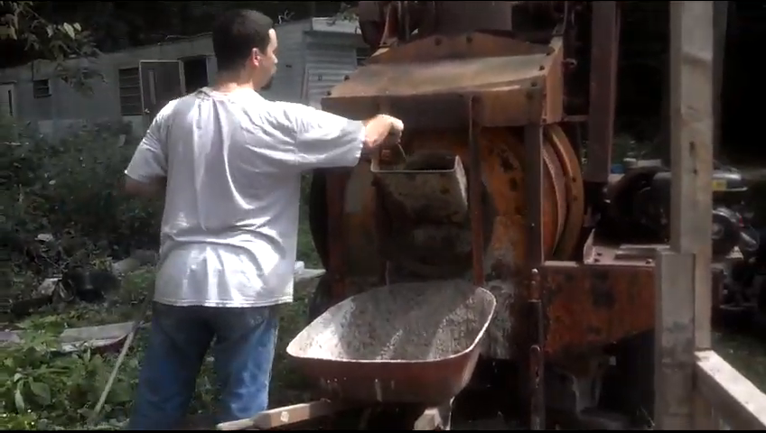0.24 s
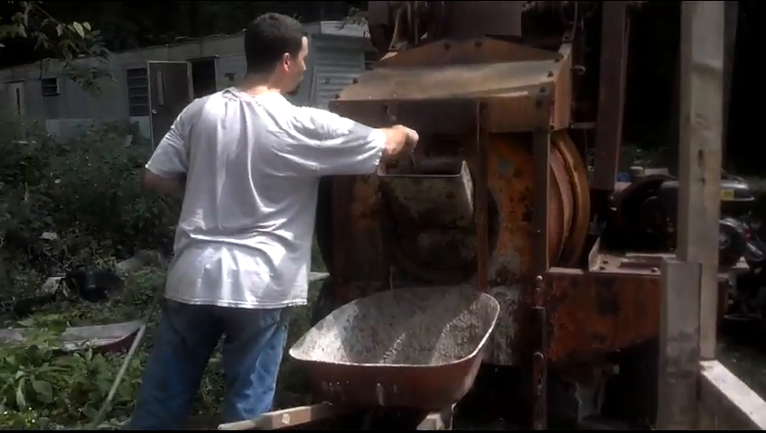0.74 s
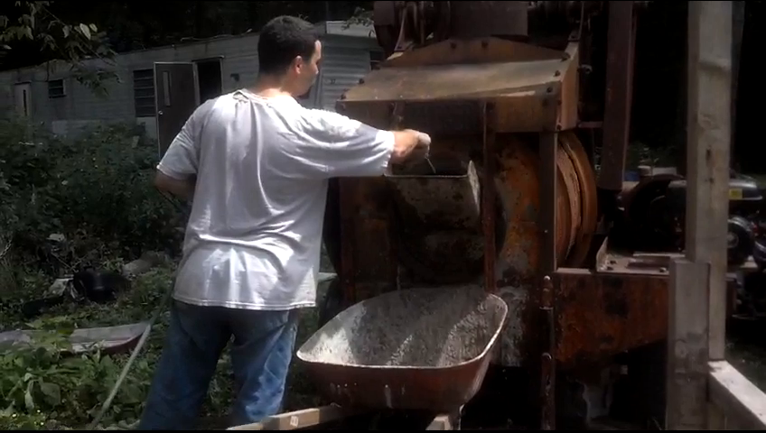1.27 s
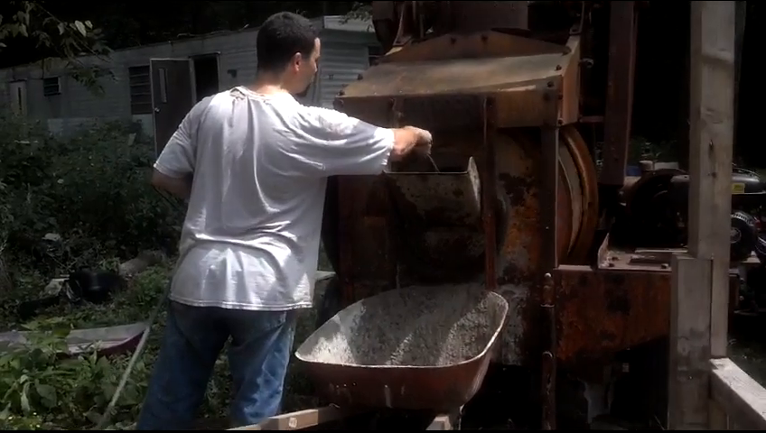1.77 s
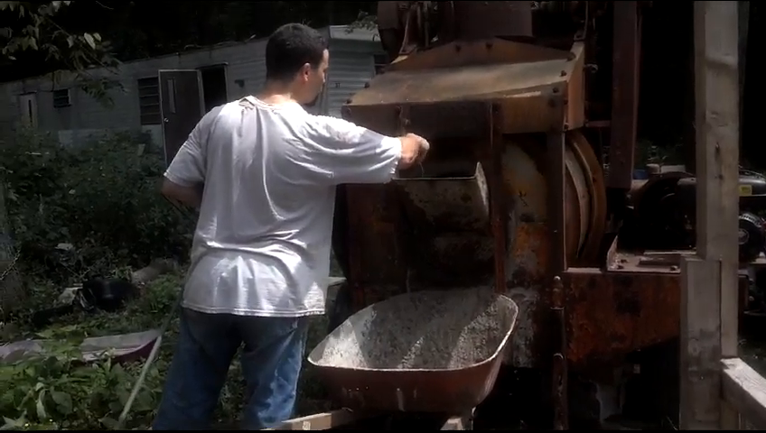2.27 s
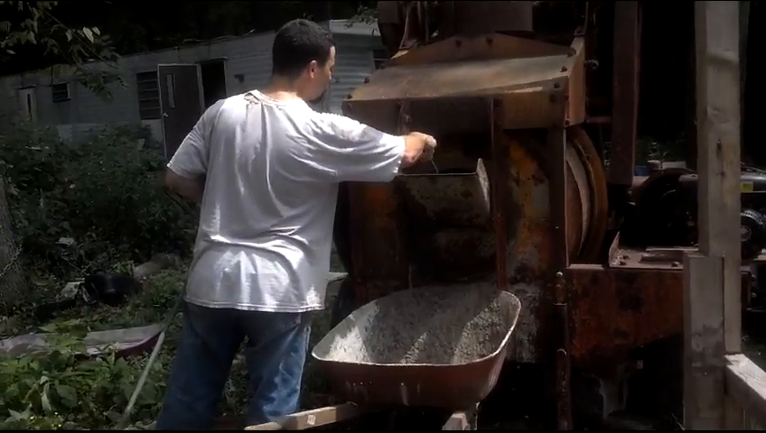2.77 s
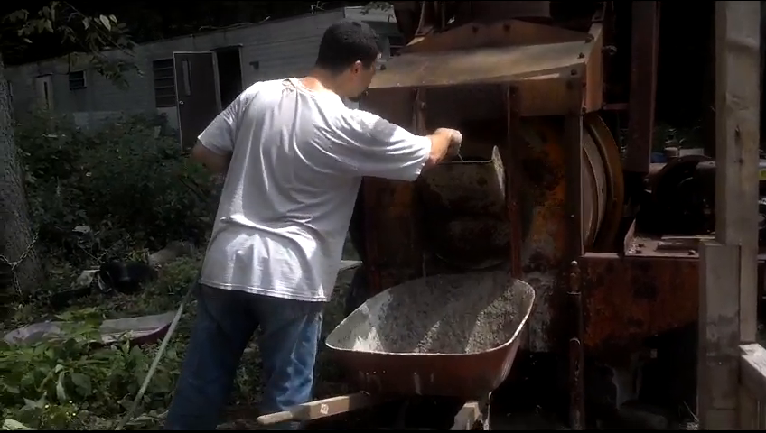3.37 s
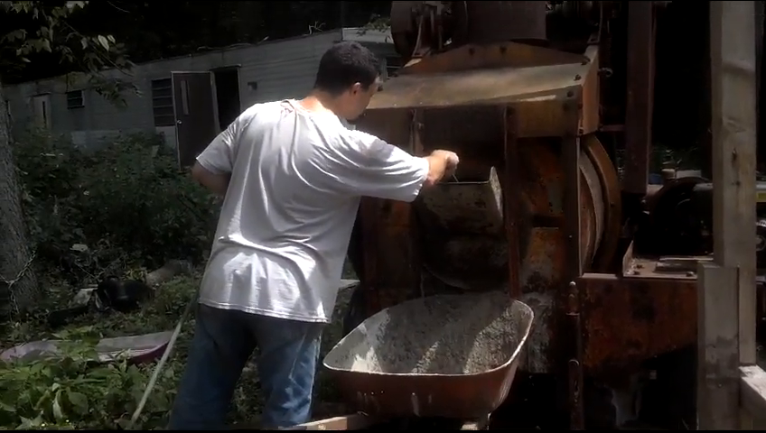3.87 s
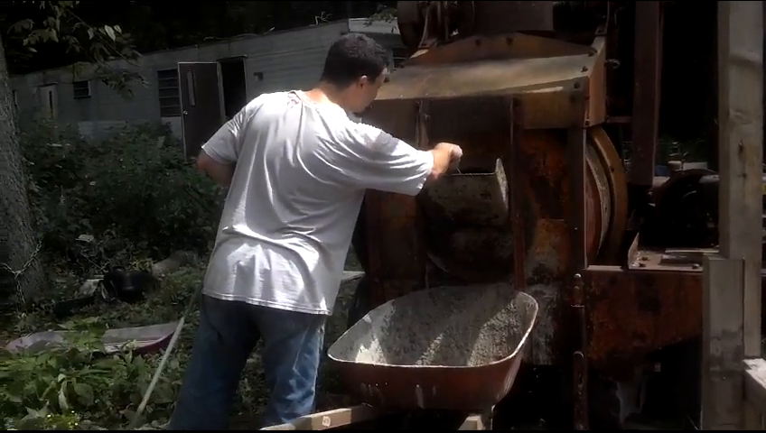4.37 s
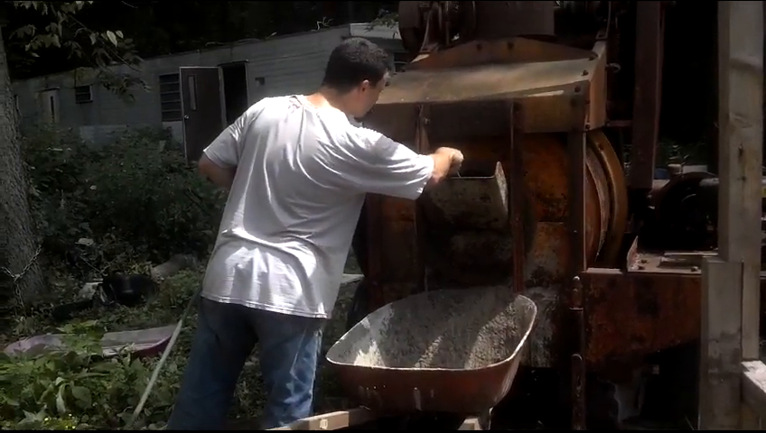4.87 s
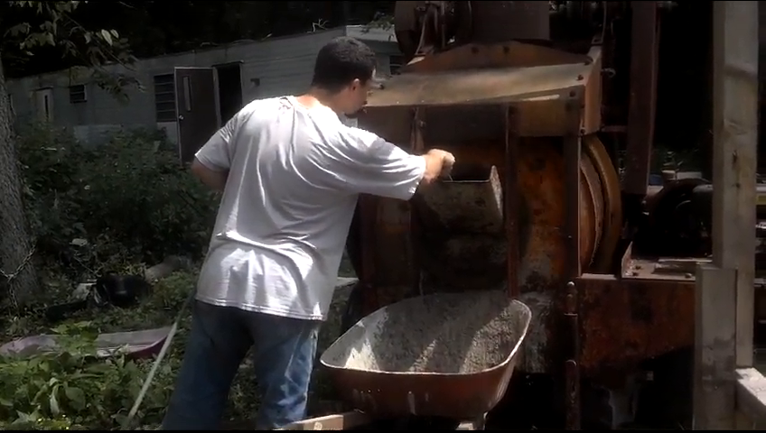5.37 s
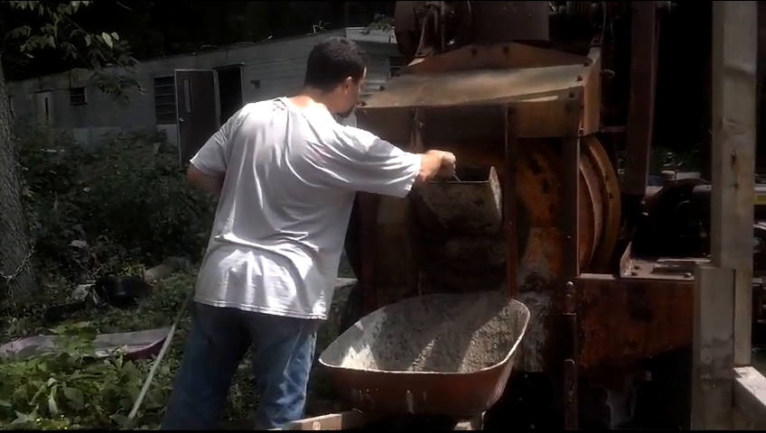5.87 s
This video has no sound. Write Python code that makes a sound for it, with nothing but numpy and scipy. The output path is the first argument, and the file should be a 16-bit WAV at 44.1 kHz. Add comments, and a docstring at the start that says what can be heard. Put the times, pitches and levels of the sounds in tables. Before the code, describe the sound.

Rapid, low engine putter with metallic valve clatter under a rumbling drum of wet gravel, broken by dull thumps and a few sharp stone knocks.

```python
"""A single-cylinder four-stroke engine turns an old steel cement mixer; its governor hunts slightly.
Throughout, exhaust pulses thud once a cycle, two valve taps ring the casing, the jolted drum booms in
surges, and random grains and noise make gravel churn and sand hiss. Struck modes make the rest: lumps of
mix boom the shell from 0.3 s, small taps and knocks clink from 0.7 s, stones knock the wall from 0.9 s,
hardest near 5.06 s. Two ports hear it out of step; automatic gain ducks loud peaks and creeps back."""
import sys
import numpy as np
from scipy import signal
from scipy.fft import rfft, irfft
from scipy.io import wavfile
from scipy.ndimage import uniform_filter1d

SR = 44100
rng = np.random.default_rng(int(sys.argv[2]) if len(sys.argv) > 2 else 0)


def persist_wave(psi):
    """Save psi, clipped to +-1, as 16-bit WAV."""
    counts = np.round(np.clip(psi, -1, 1) * 32767).astype(np.int16)
    wavfile.write(sys.argv[1], SR, np.atleast_2d(counts).T)


N = 270774
TIME = np.arange(N) / SR
FIRING_HZ = 27.86  # nominal

# Drum shell modes. Each row: frequency in Hz, width in Hz, relative peak in dB.
DRUM_MODES = [(463.5, 57, -1), (488.6, 49, 1), (560.5, 30, -8.5), (619, 66, -12), (724, 36, -13)]


def undb(db):
    """Decibels to gain."""
    return 10 ** (np.asarray(db) / 20)


def level(x, db):
    """Scale a sound to an rms level in dB; db may vary in time."""
    return x * undb(db) / np.sqrt(np.mean(x ** 2))


def along(points, hz):
    """Interpolate (Hz, value) rows on a log-frequency axis."""
    f, value = np.transpose(points)
    return np.interp(np.log(hz + 1), np.log(f), value)


def curve(rows):
    """Join (s, value) rows by straight lines in time."""
    return np.interp(TIME, *np.transpose(rows))


def ring(x, response):
    """Pass a sound through an impulse response."""
    return signal.fftconvolve(x, response)[:N]


def highpass(x, hz):
    """Second-order bass cut."""
    return signal.sosfilt(signal.butter(2, hz, "high", fs=SR, output="sos"), x)


def colour(points, size=8192):
    """Causal, minimum-phase impulse response with a given spectrum, by folding the cepstrum."""
    spectrum_db = along(points, np.fft.rfftfreq(size, 1 / SR))
    cepstrum = irfft(np.log(undb(spectrum_db)))
    cepstrum[1:size // 2] *= 2
    cepstrum[size // 2 + 1:] = 0
    return irfft(np.exp(rfft(cepstrum)))


def body(modes, size=8192):
    """Impulse response of damped modes; neighbours swing in opposite senses."""
    t = TIME[:size]
    response = np.zeros(size)
    for k, (hz, width_hz, db) in enumerate(modes):
        decay = np.exp(-np.pi * width_hz * t)
        response += (-1) ** k * undb(db) * width_hz * decay * np.sin(2 * np.pi * hz * t)
    return response


def walk(rate_hz):
    """Slow random wander of unit rms: held random steps, smoothed twice."""
    k = int(SR / rate_hz)
    steps = np.repeat(rng.standard_normal(N // k + 1), k)
    smooth = uniform_filter1d(uniform_filter1d(steps, k), k)
    return level(smooth[:N], 0)


def strokes(cycle, scatter_db):
    """One pulse of uneven strength at each whole cycle."""
    at = np.flatnonzero(np.diff(np.floor(cycle)) > 0)
    pulses = np.zeros(N)
    pulses[at] = undb(scatter_db * rng.standard_normal(len(at)))
    return pulses


def grains(rate_hz, spread_db):
    """Random tiny impacts of either sign and unequal size."""
    hit = rng.random(N) < rate_hz / SR
    sign = rng.choice([-1, 1], N)
    return hit * sign * undb(spread_db * rng.standard_normal(N))


def burst(decay_s, size=8192):
    """Decaying noise of unit energy."""
    x = rng.standard_normal(size) * np.exp(-TIME[:size] / decay_s)
    return x / np.linalg.norm(x)


def strike(rattle_db, decay_s):
    """One sharp contact followed by a weaker dying rattle."""
    push = undb(rattle_db) * burst(decay_s)
    push[0] += 1
    return push


def add(track, s, sound, db):
    """Lay a hit into a track; its level is its energy spread over 10 ms."""
    start = int(s * SR)
    part = sound[:N - start] * np.sqrt(0.01 * SR) / np.linalg.norm(sound)
    track[start:start + len(part)] += undb(db) * part


def exhaust(cycle):
    """Each firing sends a pulse through the pipe's resonances, with a decaying puff of gas noise."""
    # Each row: multiple of the firing rate, relative level in dB.
    exhaust_note = [(1, -67), (2, -45), (3, -39), (4, -8.5), (5, -1.5), (6, -6), (7, -20), (8, -4),
                    (9, 4.5), (10, -6.5), (11, -3), (12, -2.5), (13, -15.5), (14, -16.5)]
    waver_db = 1.2  # rms of a slow random waver in firing strength
    spectrum = [(k * FIRING_HZ, db) for k, db in exhaust_note]
    spectrum += [(520, -5.5), (800, -31.0), (2000, -100.5)]  # Hz, dB
    pipe = colour(spectrum)
    firings = strokes(cycle, scatter_db=0.33) * undb(waver_db * walk(5.17))
    puffs = rng.standard_normal(N) * np.exp(-(cycle % 1) / .25)
    return level(ring(firings, pipe), -31.5) + level(ring(puffs, pipe), -51.5)


def valve_gear(cycle):
    """Two valves a cycle each tap and rattle the casing, exciting its modes."""
    # Each row: share of the cycle after the firing, relative level in dB.
    valve_taps = [(-.15, -9), (.35, -10.5)]
    # Each row: frequency in Hz, width in Hz, relative peak in dB.
    casing_modes = [(577, 28, 13.5), (1112, 50, 4.5), (1239.5, 100, 11.5), (1284, 19, 13.5), (1656, 23, 5),
                    (1801, 31, 2)]
    taps, rattle = np.zeros(N), np.zeros(N)
    for turn, db in valve_taps:
        taps += undb(db) * strokes(cycle - turn, scatter_db=0.0)
        rattle += undb(db) * rng.standard_normal(N) * np.exp(-((cycle - turn) % 1) / 0.11)
    clatter = level(taps, 0) + level(rattle, -3.5)
    return level(highpass(ring(clatter, body(casing_modes)), hz=328), -31.0)


def drum_jolts(cycle):
    """The engine jolts the shell through the drive in step with its strokes."""
    # Each row: share of the cycle after the firing, relative level in dB.
    jolt_times = [(-.19, 0), (.3, -3.5)]
    jolts = sum(undb(db) * strokes(cycle - turn, scatter_db=3) for turn, db in jolt_times)
    return level(highpass(ring(jolts, body(DRUM_MODES)), hz=430), -32.5)


def drum_boom(crank):
    """The tumbling load, shaken by the crank, rings the shell; the boom surges at a beat of the drive."""
    # Slow swell as the load shifts. Each row: time in seconds, level in dB before the surge.
    boom_swell = [(0, -31), (0.55, -27.5), (1.1, -33.5), (1.4, -30.5), (2.3, -28), (2.78, -33.5),
                  (3.1, -26), (4.0, -30), (4.85, -28), (5.05, -34.5), (6.14, -31)]
    surge_hz, surge_crest_s, surge_db = 3.42, .282, 1
    tumble = grains(rate_hz=2000, spread_db=1) * undb(4 * np.cos(2 * np.pi * (crank + .3)))
    surge = surge_db * np.cos(2 * np.pi * surge_hz * (TIME - surge_crest_s))
    boom = highpass(ring(tumble, body(DRUM_MODES)), hz=380)
    return level(boom, curve(boom_swell) + surge)


def stones(crank):
    """Stones churn against the steel: grains and noise, jumping with the crank."""
    # Each row: frequency in Hz, relative density in dB per Hz.
    churn_spectrum = [(30, -25), (60, -23.5), (110, -5.5), (200, -1.5), (320, 4), (400, 3), (700, 3),
                      (950, 1.5), (1450, -2), (1900, -1), (2500, -4.5), (3100, -3), (4300, -18),
                      (5400, -16), (9000, -27.5)]
    shake_db = -0.64  # negative: least at whole crank turns
    contacts = level(grains(rate_hz=1500, spread_db=0.7), 0) + level(rng.standard_normal(N), -1.5)
    jostle = undb(1.67 * walk(30) + shake_db * np.cos(2 * np.pi * crank))
    return level(ring(contacts * jostle, colour(churn_spectrum)), -28)


def sand():
    """Sand slides in the drum: wavering noise with a hiss spectrum."""
    # Each row: frequency in Hz, relative density in dB per Hz.
    hiss_spectrum = [(2000, -31.5), (4000, 2.5), (5800, -12), (7000, 1.5), (8500, 3.5), (9900, -4.5),
                     (11300, -7.5), (11900, -11), (12600, -12), (14800, -10.5), (16000, -67)]
    # Each row: time in seconds, level in dB.
    sand_swell = [(0, -34.5), (.4, -32.5), (1.35, -34), (1.8, -32.5), (2.5, -33.5), (2.68, -36),
                  (3.05, -32.5), (3.85, -33), (4.0, -34.5), (4.3, -32.5), (5.2, -34.5), (6.14, -34)]
    slide = rng.standard_normal(N) * undb(1.23 * walk(40))
    return level(ring(slide, colour(hiss_spectrum)), curve(sand_swell))


def gravel(crank):
    """Churning stones and sliding sand, drawn afresh at each call."""
    return stones(crank) + sand()


def lumps():
    """Lumps of mix push softly on a spot of the shell and ring its modes."""
    # Each row: start in seconds, level in dB before trim_db, boom of the spot in Hz.
    lump_drops = [(0.312, -23, 510), (0.351, -19.5, 520), (0.564, -23, 490), (0.595, -16.5, 477),
                  (0.745, -25, 500), (0.78, -15, 496), (0.849, -14.5, 490), (0.924, -19.5, 490),
                  (1.081, -18, 505), (1.155, -18, 506), (2.003, -37, 487), (2.082, -16.5, 498),
                  (2.284, -21, 485), (2.323, -32, 477), (2.375, -20, 533), (2.5, -17, 515),
                  (2.54, -19.5, 496), (2.612, -21, 485), (2.663, -16.5, 493), (2.879, -15, 500),
                  (2.984, -19, 510), (3.043, -16, 530), (3.093, -20.5, 470), (3.18, -19, 510),
                  (3.248, -20, 505), (3.36, -18.5, 510), (3.43, -17.5, 510), (3.484, -27, 530),
                  (3.722, -26, 474), (4.105, -16, 482), (4.259, -17, 480), (4.397, -22, 570),
                  (4.437, -17, 500), (4.582, -27, 505), (4.614, -20, 480), (4.723, -33, 504),
                  (4.76, -15, 493), (4.829, -20, 517), (4.867, -14, 485), (4.938, -20, 510),
                  (5.114, -14.5, 490), (5.748, -19, 505), (6.086, -12.5, 515)]
    width_hz, trim_db = 47, -2
    out = np.zeros(N)
    for s, db, hz in lump_drops:
        push = body([(hz, width_hz, 0)])
        add(out, s, signal.fftconvolve(push, body(DRUM_MODES)), db + trim_db)
    return out


def clinks():
    """Bright steel clinks, small pebble taps and the high ring of stone knocks: contacts ring modes."""
    # Each row: start in seconds, level in dB, ring of the clink in Hz.
    clink_hits = [(0.673, -34, 3200), (1.2795, -25.5, 3140), (1.293, -35, 3630), (2.221, -30, 3160),
                  (2.585, -26.5, 4050), (3.268, -34, 3400), (4.458, -27, 3100), (4.929, -30, 3760),
                  (4.9402, -22, 3080), (4.9435, -28, 3910), (4.949, -33, 3700), (5.060, -19, 3300),
                  (5.063, -19.5, 3640), (5.746, -30, 3270), (5.772, -31, 3540), (6.101, -26.5, 3180)]
    # Steel modes. Each row: frequency in Hz, width in Hz, relative peak in dB.
    bright_modes = [(2960, 40, 8), (3260, 35, 4), (3140, 17, -30), (3640, 14, 10)]
    ring_width_hz, modes_db = 150, -3
    out = np.zeros(N)
    for s, db, hz in clink_hits:
        steel = level(body([(hz, ring_width_hz, 0)]), 0) + level(body(bright_modes), modes_db)
        contact = strike(rattle_db=-9, decay_s=.005)
        add(out, s, highpass(signal.fftconvolve(contact, steel), hz=2400), db)
    return out


def knocks():
    """Stones strike the drum wall: a short ring at the contact, a broad crack and the wall modes."""
    # Each row: start in seconds, level in dB, ring of the struck spot in Hz.
    stone_hits = [(0.879, -21, 1140), (0.887, -27, 1290), (1.2805, -15.5, 1070), (1.2835, -27, 830),
                  (1.289, -21, 1230), (1.297, -29, 1300), (4.446, -21, 1150), (4.4611, -18.5, 740),
                  (4.466, -27, 1040), (5.0605, -11.5, 1820), (5.0631, -9.5, 800), (5.0641, -16, 1400),
                  (5.071, -17, 1310), (5.079, -23, 1040), (5.4751, -20.5, 1150), (5.481, -15.5, 734)]
    # Crack. Each row: frequency in Hz, relative density in dB per Hz.
    blow_spectrum = [(60, -13), (250, 0), (750, 29), (1250, 21), (1800, 18), (2200, 21), (3500, -0.5),
                     (4300, 12), (6000, -14), (12000, -25)]
    # Each row: frequency in Hz, width in Hz, relative peak in dB.
    wall_modes = [(742, 16, 13), (883, 19, -3.5), (1220, 24, 6), (1280, 19, 18), (1525, 38, -5.5),
                  (1650, 16, -5), (1814, 38, 8.5)]
    spot_width_hz = 373
    out = np.zeros(N)
    for s, db, hz in stone_hits:
        spot = level(body([(hz, spot_width_hz, 0)]), 0)
        steel = spot + level(colour(blow_spectrum), -3) + level(body(wall_modes), -0.55)
        contact = strike(rattle_db=-9, decay_s=.008)
        add(out, s, highpass(signal.fftconvolve(contact, steel), hz=400), db)
    return out


def ports(direct, diffuse):
    """Direct sound reaches two microphone ports out of step; diffuse sound makes them unlike."""
    # Each row: frequency in Hz, phase in radians by which left leads.
    port_phase = [(100, -.12), (1400, 0), (2000, -2.4), (2400, -3.1), (2700, -3.2), (3300, -6.2),
                  (4050, -6.3), (4400, -3.5), (4950, -3.1), (6300, 1.2), (7500, -2.7), (8600, -6.3),
                  (9500, -7.8), (12500, -15.6)]
    # Each row: frequency in Hz, left minus right in dB.
    port_balance = [(60, -1.2), (250, -3.3), (400, -4.2), (600, -3.3), (1000, 0), (1350, 0), (1650, 4.7),
                    (2350, 0), (2600, -.3), (3100, -4.7), (3550, 0), (5000, 0), (6900, 5), (8500, 2.5),
                    (10200, -1.5)]
    # Each row: frequency in Hz, likeness of the ports from 0 to 1.
    port_likeness = [(40, .7), (100, .93), (900, .925), (1250, .99), (1550, .7), (1900, .5), (2200, .72),
                     (2380, .97), (2480, .995), (2620, .93), (2950, .35), (3150, .28), (3650, .9),
                     (4180, .1), (4780, .9), (5500, .15), (8700, .45), (11000, .15)]
    hz = np.fft.rfftfreq(N, 1 / SR)
    like = np.clip(along(port_likeness, hz), 0, .995)
    common = np.sqrt((1 + like) / 2) * rfft(direct)
    apart = np.sqrt((1 - like) / 2) * rfft(diffuse)
    # half of the lean on each side
    lean = undb(along(port_balance, hz) / 2) * np.exp(.5j * along(port_phase, hz))
    left = irfft((common + apart) * lean, N)
    right = irfft((common - apart) / lean, N)
    return np.array([left, right])


def scene():
    """The governed engine and the mixer that it drives."""
    # Governed speed. Each row: time in seconds, firings per second.
    engine_speed = [(0.0, 27.875), (0.3, 27.76), (0.5, 28.084), (0.8, 27.734), (1.2, 27.888), (1.7, 27.85),
                    (1.8, 27.585), (2.0, 28.177), (2.3, 27.721), (2.8, 28.056), (3.1, 27.547),
                    (3.3, 28.622), (3.6, 27.427), (3.8, 28.459), (4.0, 27.749), (5.0, 27.949),
                    (5.2, 27.702), (5.4, 28.13), (5.7, 27.834), (6.1, 27.929)]
    first_firing_s, scatter_db = .0039, -2
    cycle = np.cumsum(curve(engine_speed)) / SR - FIRING_HZ * first_firing_s
    crank = 2 * (cycle + .04)  # turns: two a cycle
    machine = exhaust(cycle) + valve_gear(cycle) + drum_jolts(cycle) + drum_boom(crank)
    hits = lumps() + clinks() + knocks()
    # frame and ground scatter machine and hits; gravel sounds from all over the drum
    scatter = burst(decay_s=0.037)
    diffuse = ring(machine + undb(scatter_db) * hits, scatter) + gravel(crank)
    return ports(machine + hits + gravel(crank), diffuse)


def gain_control(x, threshold_db, recover_db_per_s, attack_s):
    """Smoothed power over the threshold pulls the gain down; it creeps back at a steady dB rate."""
    pole = np.exp(-1 / (attack_s * SR))
    power = signal.lfilter([1 - pole], [1, -pole], np.mean(x ** 2, axis=0))
    excess_db = np.maximum(10 * np.log10(power + 1e-12) - threshold_db, 0)
    recovery_db = recover_db_per_s * TIME
    return x * undb(recovery_db - np.maximum.accumulate(excess_db + recovery_db))


def record(dry):
    """Camera with a thin bass, automatic gain, rounded peaks and a steep top cut."""
    thin = highpass(dry, hz=50.0)
    held = gain_control(thin, threshold_db=-12.0, recover_db_per_s=9.0, attack_s=0.0012)
    top_hz, ripple_db, stop_db = 15600, .2, 70
    top_cut = signal.ellip(8, ripple_db, stop_db, top_hz, fs=SR, output="sos")
    return signal.sosfilt(top_cut, np.tanh(held))


dry = scene()
out = record(dry)
persist_wave(out)
```